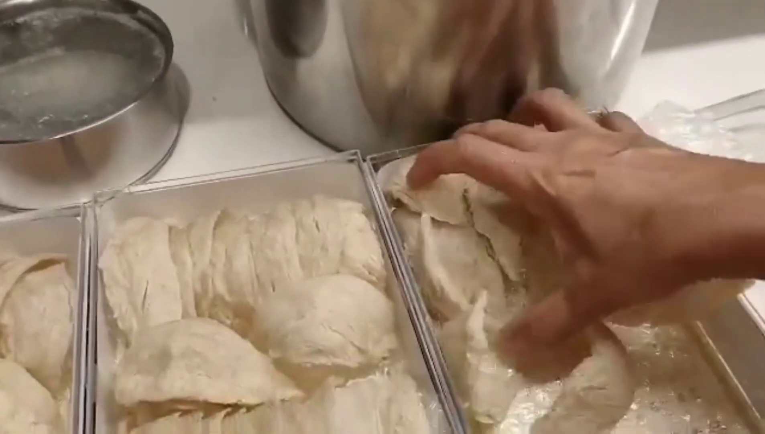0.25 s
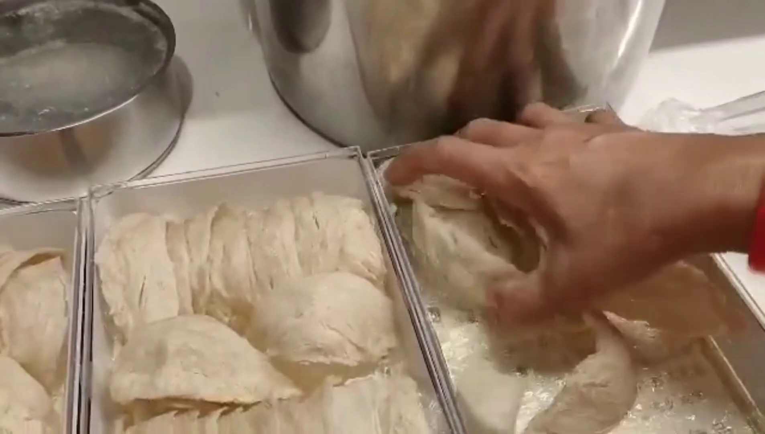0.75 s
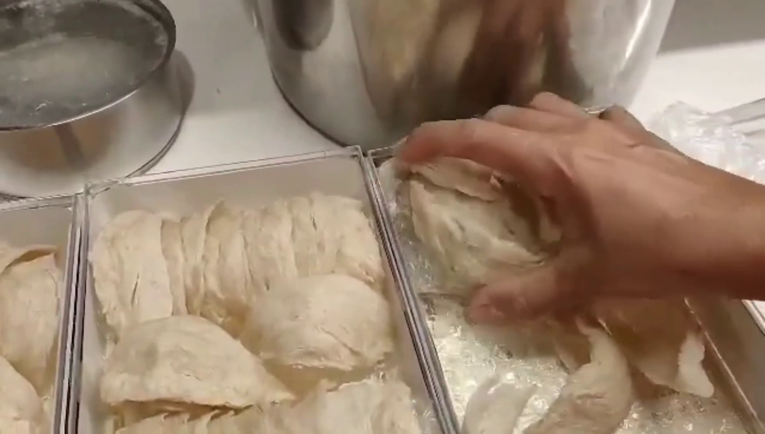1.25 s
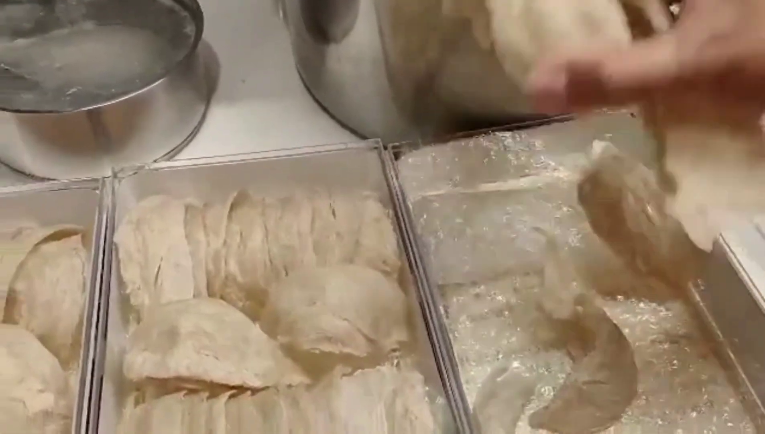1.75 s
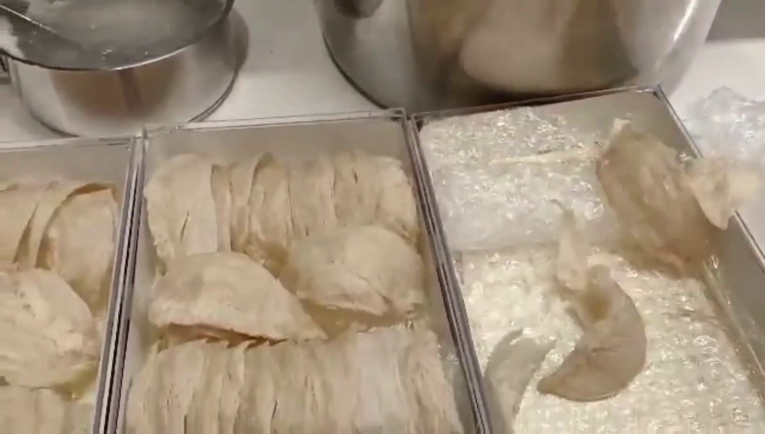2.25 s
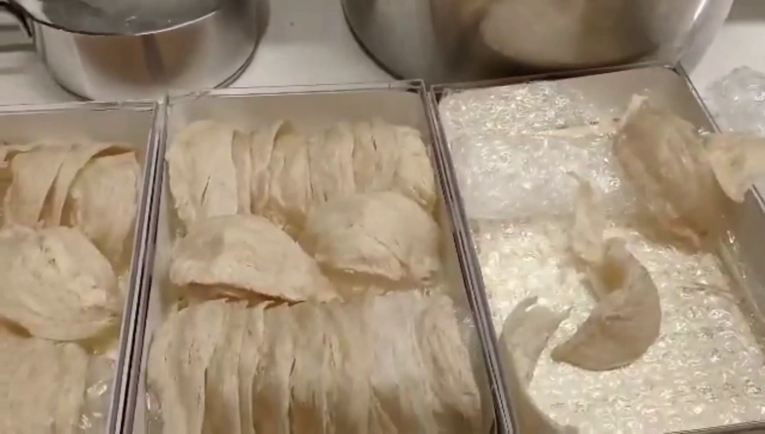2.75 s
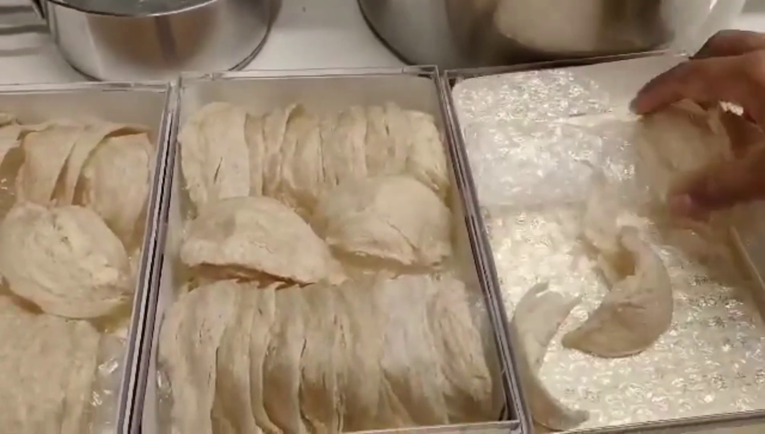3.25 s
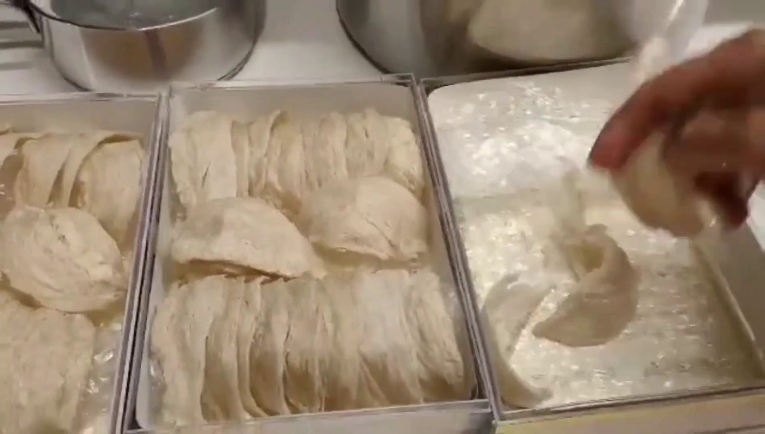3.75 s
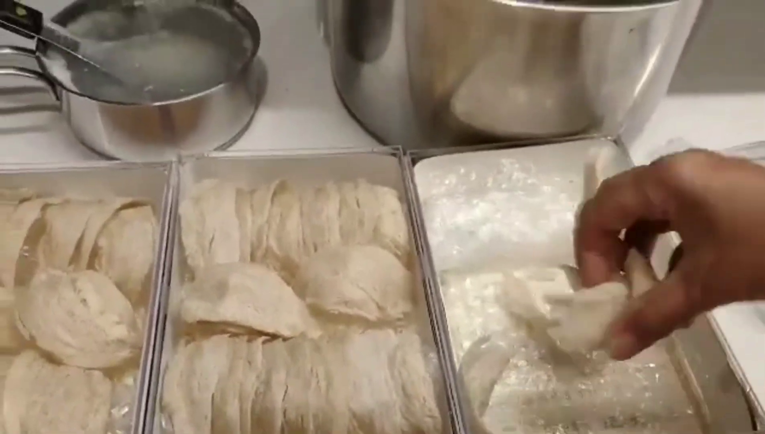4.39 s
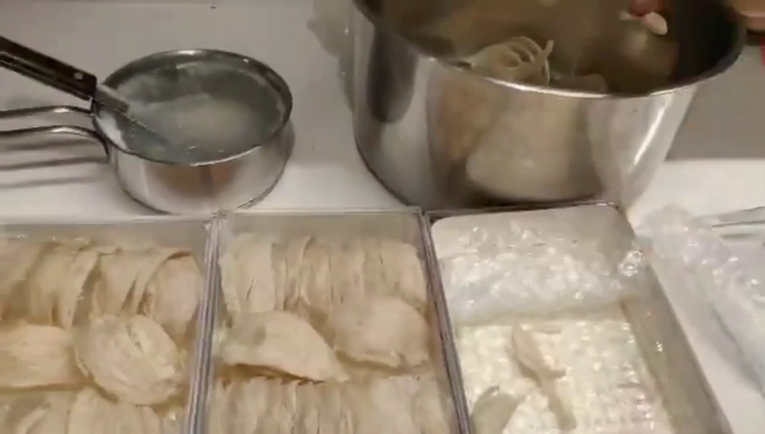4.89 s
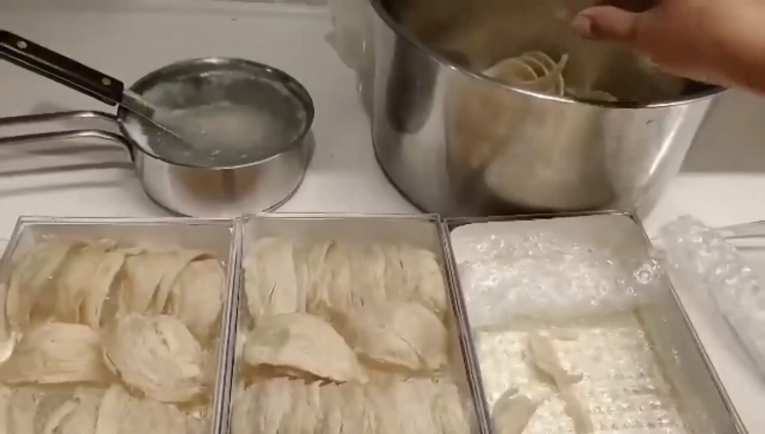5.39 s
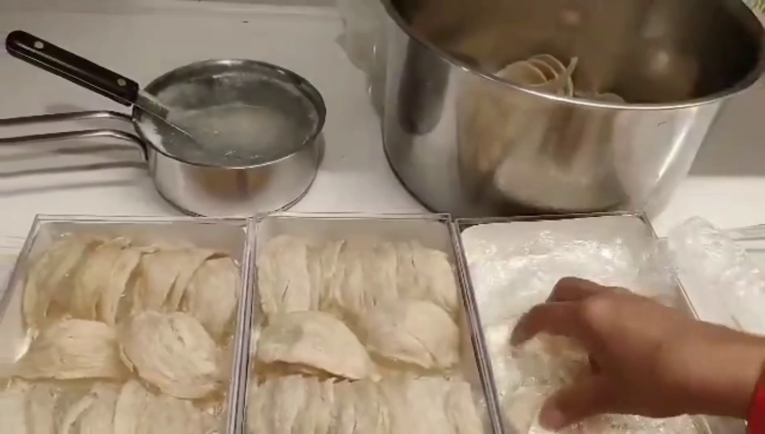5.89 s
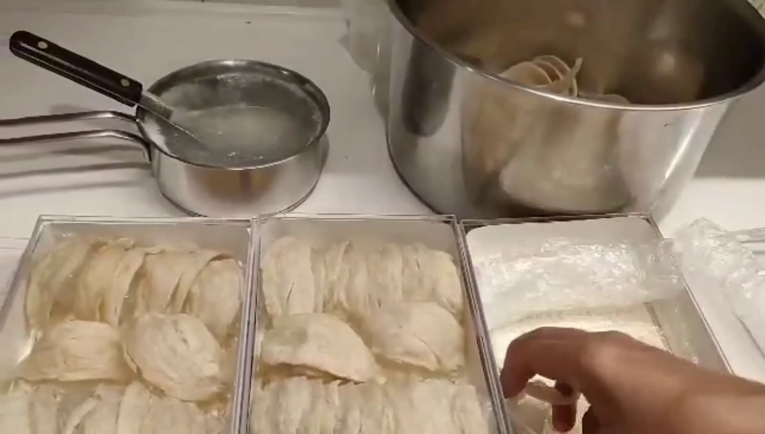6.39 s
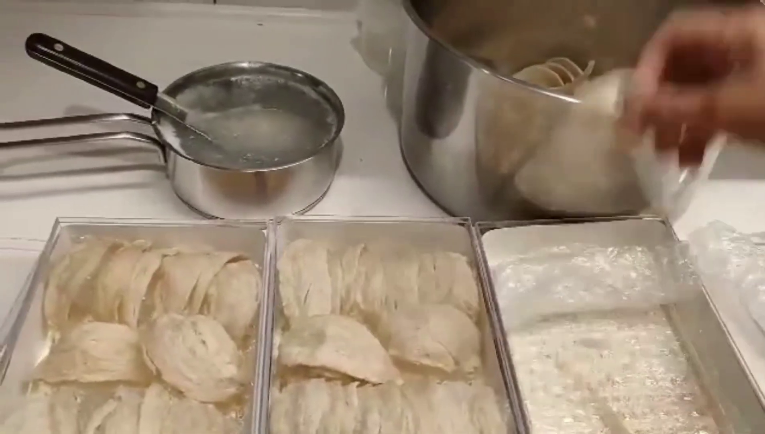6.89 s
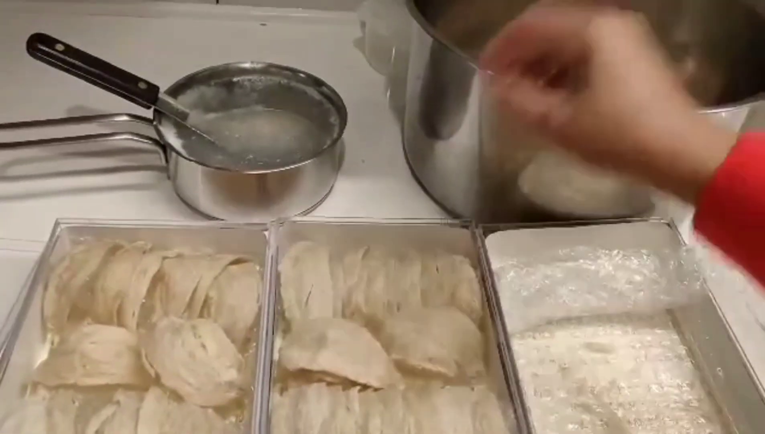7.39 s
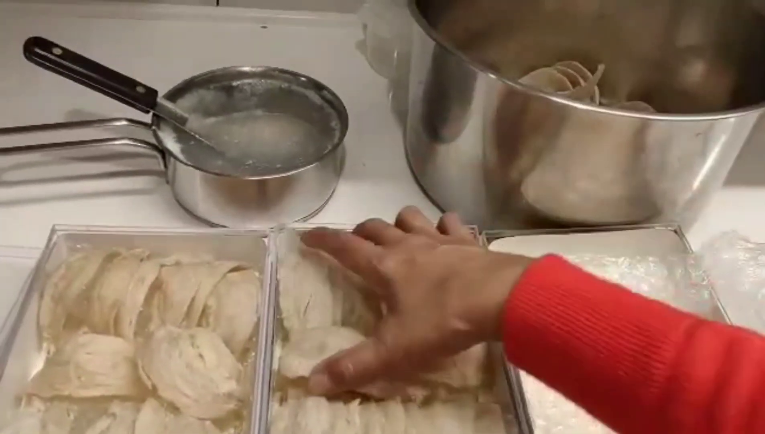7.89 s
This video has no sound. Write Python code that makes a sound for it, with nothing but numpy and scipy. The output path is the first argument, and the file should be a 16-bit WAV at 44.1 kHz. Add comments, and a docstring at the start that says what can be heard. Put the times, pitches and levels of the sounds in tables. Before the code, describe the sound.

Dry, brittle clumps rustle and snap as fingers lift them from a plastic tray, then drop with crackling thuds into a steel pot, three times.

```python
'''Dried bird's nests are picked out of a plastic tray and dropped, three times, into a steel pot in a small kitchen.
With each move of the fingers their brittle fibres rustle and snap: noise made of tiny fractures, with short pings.
The tray clacks, tapped on the counter or scraped: a set of quickly fading tones. Each nest lands with low thuds and
crackle, rocks to rest, and the steel rings on faintly as tones fed by the blows. Shaking, room noise and a hum lie below.'''
import sys
import numpy as np
from scipy import signal
from scipy.fft import rfft, irfft, next_fast_len
from scipy.io import wavfile
from scipy.ndimage import uniform_filter1d, map_coordinates

SR = 44100
rng = np.random.default_rng(int(sys.argv[2]) if len(sys.argv) > 2 else 0)


def wav_out(sig):
    """Save sig, one row per channel (or a flat mono array), as 16-bit PCM at SR to the path in sys.argv[1]."""
    wavfile.write(sys.argv[1], SR, np.round(np.clip(np.atleast_2d(sig).T, -1, 1) * 32767).astype(np.int16))


N = 358974
TIME = np.arange(N) / SR  # seconds
SHORT = TIME[:SR // 4]  # a quarter of a second, for single events
TOP_HZ = 15500  # upper limit of the sound

# Tones of the plastic tray. Each row: pitch in Hz, level in dB, time to fade by 60 dB in seconds.
TRAY = [(303.2, -5, 0.14), (410, -6.5, 0.1), (532, 2.5, 0.019), (627, -4.5, 0.035), (830, -7.5, 0.014),
        (960, 0.5, 0.037), (1274, 0.5, 0.019), (1370, -7.5, 0.036), (1786, -3, 0.026), (1970, -4, 0.024),
        (2480, -5, 0.072), (2755, -4, 0.034)]
# Colour of dry scraping. Each row: frequency in Hz, level in dB.
SCRAPE = [(100, -25), (280, 0), (600, -7), (1000, 0.5), (1300, 0.5), (2500, 2), (3800, -3), (6000, -12),
          (12000, -42.5)]
# Colour of crisp, splitting fibres. Each row: frequency in Hz, level in dB.
CRISP = [(1500, -32.5), (3500, -11), (5400, -9), (6600, 3), (8000, 0), (11000, -7), (16000, -6.5)]
# Each nest rocks to rest. Each row: start in seconds, level of the first contact in dB,
# how freely the pot wall rings in dB.
SETTLES = [(2.873, -34.5, 4.5), (5.515, -36, 2), (7.521, -45.5, 12)]
# pings of thin fibres: middle pitch in Hz, spread in octaves, cycles to fade by 60 dB
FIBRE_HZ, FIBRE_OCTAVES, FIBRE_CYCLES = 8556, 0.3, 83


def rustle(tray_db=-12, scrape_mix_db=-5, flake_db=-8, hiss_db=0.5, fibre_db=-5):
    """With each move fibres scrape on each other, flakes tick and thin strands ping; the tray sounds faintly."""
    # Moves of the fingers on the nests. Each row: start in seconds, length in seconds,
    # drive of the scraping in dB, drive of the crisp fibres in dB.
    strokes = [(0, 0.0051, -34, -42), (0.126, 0.024, -44.5, -48.5), (0.22, 0.07, -45, -51),
               (0.265, 0.03, -36, -38), (0.365, 0.017, -38.5, -52), (0.488, 0.12, -39, -65),
               (0.644, 0.13, -39, -40.5), (0.709, 0.044, -35, -35.5), (0.842, 0.05, -42.5, -45.5),
               (0.989, 0.048, -35.5, -35), (1.103, 0.17, -40, -44), (1.394, 0.11, -43.5, -45),
               (1.558, 0.068, -43.5, -47.5), (1.854, 0.02, -44.5, -52.5), (2.513, 0.22, -49.5, -47),
               (3.113, 0.19, -43, -48), (3.305, 0.22, -46, -48.5), (3.553, 0.15, -47.5, -46),
               (3.886, 0.19, -46.5, -51.5), (4.03, 0.16, -50, -49), (4.24, 0.12, -50.5, -48.5),
               (4.563, 0.038, -52, -59), (5.029, 0.14, -55, -59.5), (5.91, 0.13, -48.5, -47.5),
               (5.983, 0.13, -51.5, -44), (6.195, 0.022, -45.5, -49.5), (6.397, 0.12, -56, -54.5),
               (6.588, 0.06, -50, -48.5), (6.638, 0.015, -32, -43), (6.885, 0.039, -45, -52.5),
               (7.692, 0.059, -52, -53.5), (7.959, 0.11, -46.5, -54.5)]
    # a nest merely held in the hand keeps up a faint rustle
    rub, split = np.full(N, amp(-62)), np.full(N, amp(-69))
    for start, length, scrape_db, crisp_db in strokes:
        move = gesture(start, length, attack_s=0.017, release_db_per_s=134)
        rub = np.maximum(rub, amp(scrape_db) * move)
        split = np.maximum(split, amp(crisp_db) * move)

    slips = crackle(rate=700, spread_db=4, grain_s=0.001)
    flakes = ticks(330, centre_hz=1335, octaves=0.8, cycles=14, spread_db=14)
    body = amp(scrape_mix_db) * coloured(rub * slips, SCRAPE)
    body = body + amp(flake_db) * rub * flakes
    plastic = ring(TRAY, SHORT, scatter_db=0.5)
    body = body + amp(tray_db - 16.5) * through(body, plastic / np.linalg.norm(plastic))

    splitting = crackle(rate=1300, spread_db=4, grain_s=0.0008)
    pings = ticks(450, FIBRE_HZ, FIBRE_OCTAVES, FIBRE_CYCLES, spread_db=20)
    fibres = amp(hiss_db) * coloured(split * splitting, CRISP)
    fibres = fibres + amp(fibre_db) * split * pings

    # the level of every move is uneven, quickly and slowly
    catch = unit(amp(1.6 * wobble(110) + 1.2 * wobble(22)))
    return catch * patchy(body + fibres, depth_db=2.5)


def crumbles(attack_s=0.011, release_db_per_s=400):
    """Under a squeeze a quick run of clear, high pings comes from the breaking strands."""
    # Squeezes of a nest. Each row: start in seconds, length in seconds, level in dB.
    squeezes = [(0.27, 0.1, -49), (0.429, 0.023, -41.5), (0.495, 0.093, -45), (0.968, 0.065, -48),
                (3.295, 0.2, -45.5), (6.055, 0.085, -64), (6.572, 0.07, -46), (8.028, 0.065, -47)]
    squeeze = loudest(squeezes, attack_s, release_db_per_s)
    return squeeze * ticks(380, FIBRE_HZ, FIBRE_OCTAVES, FIBRE_CYCLES, spread_db=14)


def snaps(t60=0.03, fibre_hz=7200, flake_hz=1500, ping_t60=0.018, count=4):
    """A fibre breaks with a short crack and pings; each fibre and flake has its own pitch."""
    # Fibre snaps, loud and faint. Each row: time in seconds, crack in dB before a shared trim, body in dB.
    breaks = [(0.258, -29, -36), (0.282, -27, -33), (0.312, -30, -33), (0.348, -32, -29),
              (0.377, -19, -24.5), (0.4884, -48, -40), (0.501, -27, -28.5), (0.508, -24, -30),
              (0.5337, -23, -27), (0.57, -44, -46), (0.597, -31, -43), (0.625, -28, -30),
              (0.6985, -31, -40), (0.748, -26, -24.5), (0.786, -36, -33.5), (0.9653, -46, -57),
              (1.008, -30, -36), (1.053, -19, -28.5), (1.069, -40, -37), (1.2207, -21, -27),
              (1.445, -27, -28.5), (1.550, -31, -28.5), (1.62, -39, -37), (1.845, -43.5, -45),
              (2.311, -47, -51), (2.412, -41.5, -66), (3.139, -27.5, -56), (3.2275, -35, -30.5),
              (3.314, -47, -34), (3.3559, -36, -34.5), (3.435, -28, -35), (3.4677, -22, -69),
              (3.686, -47, -48.5), (4.026, -25, -34), (4.046, -29, -35.5), (4.175, -28.5, -41),
              (4.192, -30.5, -40), (4.727, -35, -49.5), (5.9285, -32, -50.5), (5.944, -35, -49),
              (6.117, -29, -36), (6.399, -36.5, -53.5), (6.438, -33, -51), (6.5833, -34, -39),
              (6.6104, -28, -52), (6.6593, -22.5, -21.5), (6.7207, -32, -53), (7.9475, -27.5, -30.5),
              (8.084, -40, -41), (8.1228, -27.5, -32.5)]
    cracks = np.zeros((2, N))
    onset = 1 - np.exp(-SHORT / 0.0006)
    for s, crack_db, body_db in breaks:
        grit = two_ports(rng.standard_normal((2, len(SHORT)))) * onset * amp(-60 * SHORT / t60)
        # pitch ratios: one for the flake, the rest for the fibres
        flake, *fibres = np.exp(np.clip(0.22 * rng.standard_normal(count + 1), -0.5, 0.5))
        modes = [(fibre * fibre_hz, -12, ping_t60) for fibre in fibres]
        ping = onset * ring(modes, SHORT, scatter_db=3)
        body = resonant(coloured(grit, SCRAPE), flake * flake_hz, q=6.7, boost_db=-8)
        add(cracks, s, amp(body_db) * body)
        add(cracks, s, amp(crack_db - 2.5) * (amp(2.0) * coloured(grit, CRISP) + ping))
    return cracks


def tray_clacks(crack_t60=0.044, chatter_db=-14):
    """Dry, damped clacks of the plastic tray, tapped on the counter or scraped by a nest; each spot favours its own tones."""
    # Each row: time in seconds, level in dB before a trim, favoured pitch in Hz, its spread in octaves.
    contacts = [(0.202, -11.5, 1160, 0.92), (0.259, -19, 1040, 0.93), (0.377, -20.5, 1000, 2.2),
                (0.699, -22, 920, 0.29), (1.053, -30, 820, 0.33), (1.169, -31, 1350, 0.62),
                (1.564, -28.5, 1300, 1.3), (3.193, -31, 604, 0.84), (3.287, -33, 960, 0.64),
                (3.437, -30.5, 520, 0.56), (3.687, -57, 523, 0.76), (3.902, -23, 650, 2),
                (4.051, -30.5, 450, 1.6), (4.099, -25.5, 860, 0.46), (4.174, -30.5, 1800, 0.72),
                (6.659, -23, 1400, 0.26), (7.95, -32.5, 700, 0.81)]
    clacks = np.zeros((2, N))
    onset = 1 - np.exp(-SHORT / 0.0005)
    for s, db, centre_hz, octaves in contacts:
        # tones far from the favoured pitch are weaker
        modes = [(hz, level - 6 * (np.log2(hz / centre_hz) / octaves) ** 2, t60) for hz, level, t60 in TRAY]
        clack = onset * ring(modes, SHORT, scatter_db=4.5)
        grit = two_ports(rng.standard_normal((2, len(SHORT)))) * onset * amp(-60 * SHORT / crack_t60)
        chatter = resonant(coloured(grit, SCRAPE), centre_hz, q=2.9, boost_db=14)
        add(clacks, s, amp(db - 4.5) * clack / np.abs(clack).max() + amp(db + chatter_db) * chatter)
    return clacks


def tumbles(thud_t60=0.028, clatter_t60=0.077, crisp_t60=0.12, rise_s=0.0023, push_s=0.0032,
            low_db=-7, high_db=-7, edge_hz=2350, edge_db=-2):
    """Each landing is a hollow thud and a quick shower of brittle edges, coloured by the spot of steel it hits."""
    # A nest strikes the pot. Each row: time in seconds, clatter in dB before a trim, clatter pitch in Hz,
    # thud in dB before a trim, thud pitch in Hz, crisp splintering in dB before a trim.
    landings = [(2.671, -27, 2760, -11.5, 570, -33), (2.689, -20, 1700, -16, 520, -25.5),
                (2.707, -14, 2700, -9, 468, -16), (2.715, -5.5, 1880, -5.5, 520, -14),
                (2.728, -7.5, 2180, -3.5, 530, -13), (2.745, -8, 2040, -20, 500, -13.5),
                (2.763, -18, 1740, -13.5, 438, -20), (2.798, -12, 2760, -24, 424, -24),
                (2.812, -15.5, 2720, -15, 550, -32), (2.848, -21.5, 2910, -13.5, 565, -32),
                (2.895, -29, 1800, -24, 526, -28.5), (2.967, -30, 1740, -28.5, 497, -38.5),
                (3.053, -35, 2410, -33, 600, -51), (3.079, -37, 1400, -41, 560, -56),
                (5.310, -22.5, 1370, -23, 503, -33), (5.340, -46, 2400, -22, 496, -47),
                (5.354, -22, 1390, -14, 483, -38), (5.365, -26, 2200, -27, 511, -35.5),
                (5.378, -25.5, 2400, -13.5, 514, -35), (5.401, -26, 900, -21, 470, -37),
                (5.433, -23.5, 1950, -32, 470, -34), (5.461, -36.5, 2190, -22, 506, -39),
                (5.492, -37, 2130, -26, 447, -35), (7.311, -28.5, 1098, -21.5, 562, -35.5),
                (7.334, -28, 2220, -26, 550, -41), (7.347, -28, 2900, -30, 627, -48),
                (7.359, -30, 1000, -26, 505, -42), (7.391, -37, 2200, -35, 560, -45),
                (7.411, -41, 2300, -30, 530, -48), (7.466, -38, 1890, -31, 515, -49),
                (7.485, -36.5, 905, -30.5, 503, -46.5)]
    # Colour of the clatter. Each row: frequency in Hz, level in dB.
    clatter = [(80, -22), (220, -17), (380, -6.5), (760, 2.5), (1020, -3.5), (1300, -2), (1600, -7.5),
               (1930, -6.5), (2900, -3.5), (4000, -7), (6000, -4), (14000, -50.5)]
    # Colour of the splintering. Each row: frequency in Hz, level in dB.
    splinter_colour = [(1500, -29.5), (3500, -3.5), (5400, -2), (6600, 1.5), (8000, -1.5), (11000, -8),
                       (16000, -3)]
    thud, crisp_power = np.zeros((2, N))
    edges = np.zeros((2, N))
    onset = 1 - np.exp(-SHORT / rise_s)
    push = 1 - np.exp(-(SHORT / push_s) ** 2)  # the springy nest loads the pot's bottom gently
    shower = onset * amp(-60 * SHORT / clatter_t60)
    clicks = ticks(900, edge_hz, octaves=0.4, cycles=26, spread_db=12)
    grit = coloured(crackle(rate=1400, spread_db=3.5, grain_s=0.0012), clatter)
    grit = grit + amp(edge_db) * clicks
    for s, clatter_db, clatter_hz, thud_db, thud_hz, crisp_db in landings + rocking():
        # the lopsided nest touches at three points almost together: pitch ratio, dB, longest delay in s
        for ratio, db, lag_s in [(1, 0, 0.00068), (0.82, low_db, 0.0089), (1.16, high_db, 0.008)]:
            mode = (ratio * thud_hz, thud_db + db + 6.0, thud_t60)
            add(thud, s + lag_s * rng.random(), push * ring([mode], SHORT, scatter_db=0.5))
        # a random stretch of the grit makes every burst different
        burst = grit[:, rng.integers(N - len(SHORT)):][:, :len(SHORT)] * shower
        burst = unit(resonant(burst, clatter_hz, q=2.5, boost_db=2)) * np.sqrt(np.mean(shower ** 2))
        add(edges, s, amp(clatter_db + 3.5) * burst)
        # overlapping splinters add in power
        add(crisp_power, s, (onset * amp(crisp_db + 9.0 - 60 * SHORT / crisp_t60)) ** 2)
    splitting = crackle(rate=1500, spread_db=2.0, grain_s=0.0037)
    return thud + edges + coloured(np.sqrt(crisp_power) * splitting, splinter_colour)


def rocking(count=4):
    """Contacts that tend to come quicker and weaker as each nest comes to rest, in rows like the landings."""
    first_gap_s, shrink, loss_db = 0.04, 0.9, 8  # each gap over the one before, loss per contact
    contacts = []
    for s, first_db, _ in SETTLES:
        for k, (gap, size, pitch) in enumerate(rng.standard_normal((count, 3))):
            db = first_db - loss_db * k + 0.57 * size
            thud_hz = 487 * np.exp(0.12 * pitch)
            contacts.append((s, db, 2180, db + 1, thud_hz, db - 8))
            s += first_gap_s * shrink ** k * np.exp(0.17 * gap)
    return contacts


def pot(blows, air_db=-26, steel_db=-23, shimmer_db=-23):
    """The hollow of the pot booms briefly; its wall stores the energy of the blows and sings on."""
    # Tones of the pot wall; each drop hits another spot. Each row: pitch in Hz, time to fade by 60 dB
    # in seconds, then relative level in dB in the first, second and third drop.
    steel = [(502, 0.6, -12, -16, -20), (834, 1.3, -18.5, -19, -7.5), (982, 1.3, -14.5, -20, -6.5),
             (1109, 1.3, -12.5, -16, -11), (1450, 0.88, -14.5, -12, -6.5), (1695, 3.5, -11, -10, -15),
             (1790, 1.1, -8, -10, -12.5), (1840, 0.89, -11, -3, -23), (1938, 0.28, -3, -8.5, -15),
             (2070, 0.36, -5.5, -2.5, -3), (2250, 1, -16.5, -22, -9), (2520, 1.2, -1.5, -17.5, -5),
             (3000, 1.6, -8.5, -14.5, -13), (3700, 1, -10, -18.5, -17), (4200, 0.3, -9, -16.5, -18.5),
             (7996, 0.3, -13, -19, -21.5), (8700, 0.3, -14.5, -19, -23.5), (8987, 0.3, -12.5, -19, -23)]
    # Tones of the hollow. Each row: pitch in Hz, relative level in dB, time to fade by 60 dB in seconds.
    pot_air = [(390, 5, 0.06), (428.3, 2, 0.23), (527, -2, 0.048), (590, -5, 0.11)]
    air = ring(pot_air, TIME[:SR], scatter_db=8)
    hollow = blows + amp(air_db) * through(blows, air / np.linalg.norm(air))

    settle_s, _, freedom_db = np.transpose(SETTLES)
    on_wall = blows * amp(np.interp(TIME, settle_s, freedom_db))
    power = np.abs(uniform_filter1d(np.mean(on_wall ** 2, axis=0), size=256))
    # which drop (0, 1 or 2) each moment belongs to
    drop = np.searchsorted((settle_s[:-1] + settle_s[1:]) / 2, TIME)
    wall = np.zeros((2, N))
    for hz, t60, *drop_db in steel:
        keep = amp(-60 / (t60 * SR)) ** 2  # share of the energy left after one sample
        stored = signal.lfilter([1 - keep], [1, -keep], power * (amp(drop_db) ** 2)[drop])
        tone = np.sin(2 * np.pi * (hz * TIME + rng.random((2, 1)) / 4))
        wall += amp(0.7 * wobble(12)) * np.sqrt(stored) * tone
    return shifting_kitchen(hollow, wet_db=-1.0) + amp(steel_db) * wall + amp(shimmer_db) * shimmer(on_wall)


def shimmer(blows, count=50, t60=0.3):
    """Besides its main tones the thin wall has a crowd of weak, close modes."""
    t = TIME[:SR * 2 // 3]
    modes = np.sin(2 * np.pi * rng.uniform(1400, 4000, (count, 1)) * t)
    strengths = rng.standard_normal((2, count))
    wall = np.einsum("cm,mt->ct", strengths, modes) * amp(-60 * t / t60)
    return through(blows, wall / np.linalg.norm(wall[0]))


def shifting_kitchen(x, wet_db, step_s=0.02, count=5):
    """A tumbling nest keeps changing its place: the sound fades round a cycle of different room answers."""
    turn = TIME / step_s
    answers = 0
    for k in range(count):
        weight = np.clip(1 - np.abs((turn - k) % count - 1), 0, 1)
        answers = answers + kitchen(x * weight, wet_db)
    return answers


def kitchen(x, wet_db):
    """Hard walls and counters answer with a tail of fading noise, the highest treble dying first."""
    # Each row: frequency in Hz, time for the room's answer to fade by 60 dB in seconds.
    fade_times = [(150, 0.19), (500, 0.34), (2500, 0.35), (8000, 0.34), (14000, 0.13)]
    hz, t, z = signal.stft(two_ports(rng.standard_normal((2, SR))), SR, nperseg=256)
    tail = signal.istft(z * amp(-60 * t / along(fade_times, hz)[:, None]), SR, nperseg=256)[1]
    tail *= np.clip(TIME[:tail.shape[1]] / 0.009, 0, 1)  # the answer builds up over 9 ms
    return x + amp(wet_db) * through(x, tail / np.linalg.norm(tail[0]))


def rumble(attack_s=0.018, release_db_per_s=130):
    """The grip on the nests shakes tray and microphone in lumps of low noise, mostly on the left."""
    # The grip shakes the tray. Each row: start in seconds, length in seconds, level in dB before left and right.
    grips = [(0.391, 0.39, -32.5), (0.435, 0.03, -30.5), (0.49, 0.04, -31.5), (0.56, 0.03, -29.5),
             (0.63, 0.022, -32), (0.692, .08, -38.5), (0.79, 0.13, -40.5), (0.976, 0.11, -40.5),
             (1.15, 0.076, -44), (3.034, 0.098, -48.5), (3.183, 0.072, -47.5), (3.74, 0.044, -47.5)]
    colour = [(20, 1.0), (45, 9.5), (95, -1.5), (185, -10.5), (300, -34), (800, -37)]  # Hz, dB
    shake = coloured(rng.standard_normal((2, N)), colour)
    grip = loudest(grips, attack_s, release_db_per_s)
    lumps = unit(amp(1.64 * wobble(29)))
    return shake * grip * lumps * amp([[3], [-10]])  # left and right, dB


def background(hush_db=-51, hum_db=-1):
    """Low room noise and the unsteady hum of an appliance, made of wavering tones."""
    # Colour of the room noise. Each row: frequency in Hz, relative level in dB.
    hush_colour = [(12, -19.5), (21, 0), (30, -7), (45, -11), (65, -16.5), (110, -12.5), (150, -24.5),
                   (280, -19), (450, -20), (1110, -35), (2280, -36.5), (7030, -54), (12000, -51),
                   (16000, -84)]
    # Tones of the appliance. Each row: pitch in Hz, level in dB before the shared hum level.
    hum_tones = [(113.0, -57.5), (269.2, -62.5)]
    noise = two_ports(rng.standard_normal((2, N)))
    size = next_fast_len(N)
    gain = amp(along(hush_colour, np.fft.rfftfreq(size, 1 / SR)))
    hush = irfft(rfft(noise, size) * gain, size)[:, :N]
    hum = 0
    for hz, db in hum_tones:
        level = amp(db + hum_db + 1.4 * wobble(15))
        hum = hum + level * np.sin(2 * np.pi * hz * TIME + 1.7 * wobble(9.6))
    return amp(hush_db) * unit(hush) + hum


def gesture(start, length, attack_s, release_db_per_s):
    """Gain that rises, holds and dies away."""
    t = TIME - start
    return np.clip(t / attack_s, 0, 1) * amp(-np.clip(release_db_per_s * (t - length), 0, 120))


def loudest(rows, attack_s, release_db_per_s):
    """Gain of the strongest gesture at each moment, from rows of start, length and level in dB."""
    gains = [amp(db) * gesture(start, length, attack_s, release_db_per_s) for start, length, db in rows]
    return np.max(gains, axis=0)


def crackle(rate, spread_db, grain_s):
    """Stereo stream of tiny fractures of very unequal size, rate a second, rms 1."""
    sizes = (rng.random(N) < rate / SR) * amp(spread_db * np.minimum(rng.standard_normal(N), 2))
    power = through(sizes ** 2, np.exp(-SHORT / grain_s))
    return unit(np.sqrt(np.abs(power)) * two_ports(rng.standard_normal((2, N))))


def ticks(rate, centre_hz, octaves, cycles, spread_db):
    """Stereo stream of separate little ringing pieces, each with its own pitch, size and place, rms 1."""
    when, pitch, size, place = rng.random((4, int(rate * N / SR), 1))
    t = SHORT[:SR // 60]
    hz = np.clip(centre_hz * 2 ** (octaves * np.sqrt(3) * (2 * pitch - 1)), 100, TOP_HZ)
    # the cube makes most pieces small and a few large
    grains = amp(spread_db * size ** 3 - 60 * t * hz / cycles) * np.sin(2 * np.pi * hz * t)
    where = ((when * N).astype(int) + np.arange(len(t))).ravel()
    pair = []
    for share in (np.cos, np.sin):
        placed = grains * share(2 * np.pi * place)
        pair.append(np.bincount(where, placed.ravel(), N)[:N])
    return unit(two_ports(np.array(pair)))


def ring(modes, t, scatter_db):
    """Damped modes (Hz, dB, t60 in seconds), each struck at a slightly new strength."""
    total = 0
    for hz, db, t60 in modes:
        strength = db + scatter_db * rng.standard_normal()
        total = total + amp(strength - 60 * t / t60) * np.sin(2 * np.pi * hz * t)
    return total


def resonant(x, hz, q, boost_db):
    """Lift one broad resonance out of a sound and keep its power."""
    lifted = x + amp(boost_db) * signal.lfilter(*signal.iirpeak(hz, q, fs=SR), x)
    return lifted * np.std(x) / np.std(lifted)


def patchy(x, depth_db):
    """Every flake has its own size, so the colour shifts from moment to moment."""
    z = signal.stft(x, nperseg=512)[2]
    field = rng.standard_normal(z.shape[1:])
    for _ in range(2):  # smooth over pitch, then over time
        field = uniform_filter1d(uniform_filter1d(field, size=6, axis=0), size=4, axis=1)
    return signal.istft(z * unit(amp(depth_db * unit(field))), nperseg=512)[1][:, :N]


def wobble(rate):
    """A smooth random curve, rate knots a second."""
    coarse = TIME[::64]
    knots = rng.standard_normal(int(N * rate / SR) + 4)
    return np.interp(TIME, coarse, map_coordinates(knots, [coarse * rate]))


def two_ports(pair):
    """Two unrelated sounds become a stereo pair that is alike in the bass."""
    # Each row: frequency in Hz, likeness of left and right from 0 to 1.
    alike = [(100, 0.99), (450, 0.79), (1000, 0.099), (2000, 0.013), (8000, 0.071)]
    size = next_fast_len(pair.shape[1])
    turn = np.arccos(np.clip(along(alike, np.fft.rfftfreq(size, 1 / SR)), -1, 1)) / 2
    mid, side = irfft(rfft(pair, size) * [np.cos(turn), np.sin(turn)], size)[:, :pair.shape[1]]
    return np.array([mid + side, mid - side])


def coloured(x, spectrum):
    """Colour a white sound and keep its power."""
    impulse = response(spectrum)
    return through(x, impulse / np.linalg.norm(impulse))


def response(spectrum, size=2048):
    """Impulse response with the given colour that starts at once, with no sound ahead of time zero."""
    cepstrum = irfft(np.log(amp(along(spectrum, np.fft.rfftfreq(size, 1 / SR)))))
    # fold the backward half onto the forward half
    cepstrum[1:size // 2] *= 2
    cepstrum[size // 2 + 1:] = 0
    return irfft(np.exp(rfft(cepstrum)))


def through(x, impulse):
    """Sound passed through an impulse response."""
    return signal.oaconvolve(np.atleast_2d(x), np.atleast_2d(impulse), axes=1)[:, :x.shape[-1]]


def along(points, hz):
    """(Hz, value) points read on a log frequency axis."""
    f, v = np.transpose(points)
    return np.interp(np.log(hz + 1), np.log(f + 1), v)


def add(track, s, sound):
    """Mix a sound into a track from time s on."""
    room = track[..., max(round(s * SR), 0):][..., :sound.shape[-1]]
    room += sound[..., :room.shape[-1]]


def amp(db):
    """Decibels to gain."""
    return np.exp(np.asarray(db) * np.log(10) / 20)


def unit(x):
    """Scaled to rms 1."""
    return x / np.sqrt(np.mean(x ** 2) + 1e-20)


def scene():
    """The tray is close; the pot throws its sound up into the room."""
    handling = kitchen(rustle() + crumbles(), wet_db=-8)
    strikes = kitchen(patchy(snaps(), depth_db=0.5) + tray_clacks(), wet_db=-6.5)
    return handling + strikes + pot(tumbles()) + rumble() + background()


def record(dry, ceiling=1.0):
    """Stereo colour with a dip near 4.6 kHz and little above 12 kHz, soft overload and a band limit."""
    # Each row: frequency in Hz, overall level in dB.
    overall = [(3000, 2.5), (3900, -2.5), (4300, -11.5), (4650, -14), (5200, -4), (6300, -5), (7900, 2),
               (9000, -1.5), (10200, -8), (12500, -15.5), (14000, -38.5)]
    # Each row: frequency in Hz, left minus right in dB.
    lean = [(100, 1), (550, 1), (1300, -2), (2300, -5), (4000, 3.5), (8000, -0.5)]
    sides = [response([(hz, side * db / 2) for hz, db in lean]) for side in (1, -1)]
    left, right = through(through(dry, response(overall)), np.array(sides))
    # sound reaches the left side first, by 3 samples
    x = np.array([left, np.pad(right, (3, 0))[:N]])
    x = x / (1 + np.abs(x / ceiling) ** 6) ** (1 / 6)
    return signal.sosfilt(signal.butter(N=12, Wn=TOP_HZ, fs=SR, output="sos"), x)


dry = scene()
out = record(dry)
wav_out(out)
```